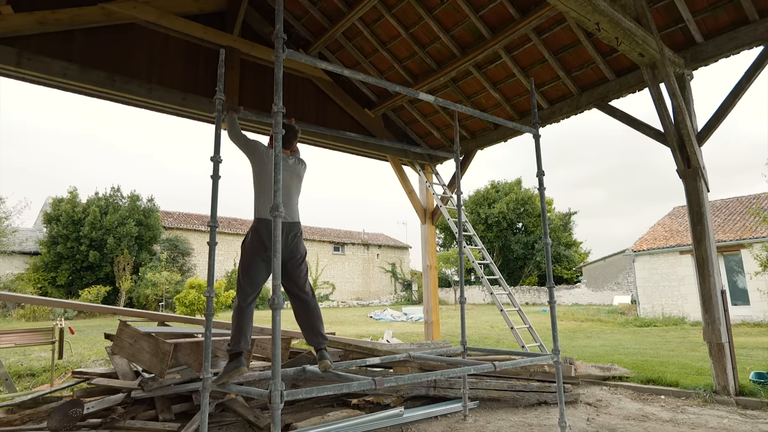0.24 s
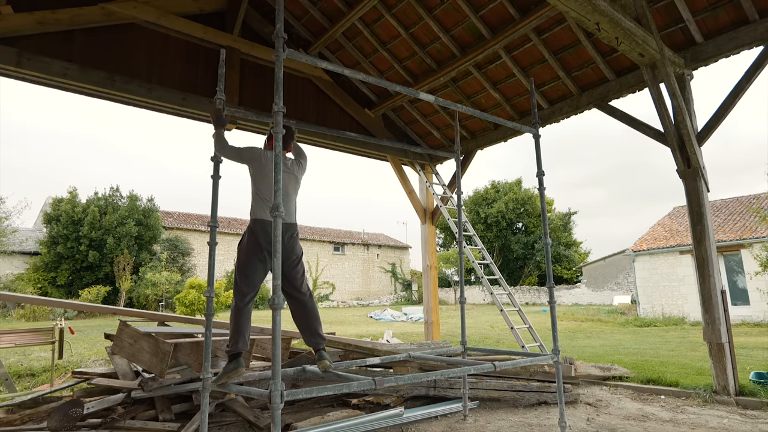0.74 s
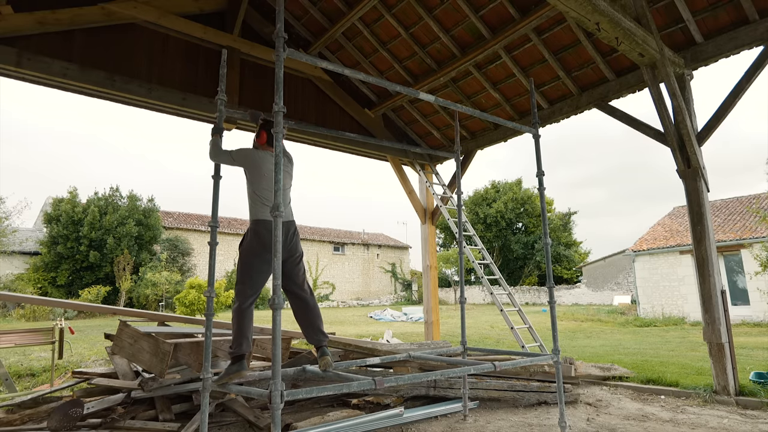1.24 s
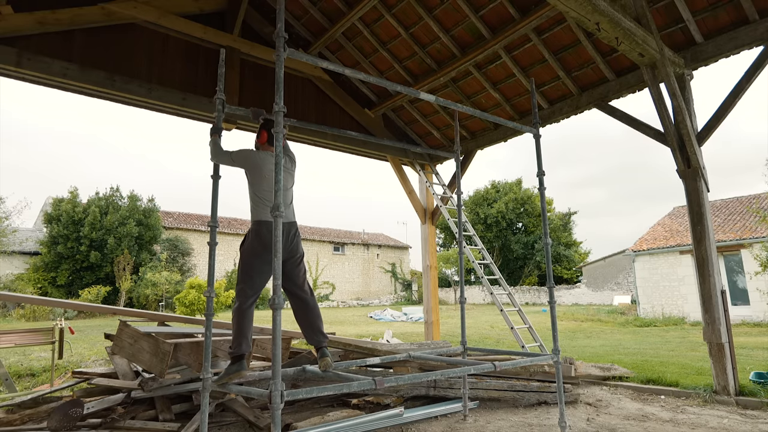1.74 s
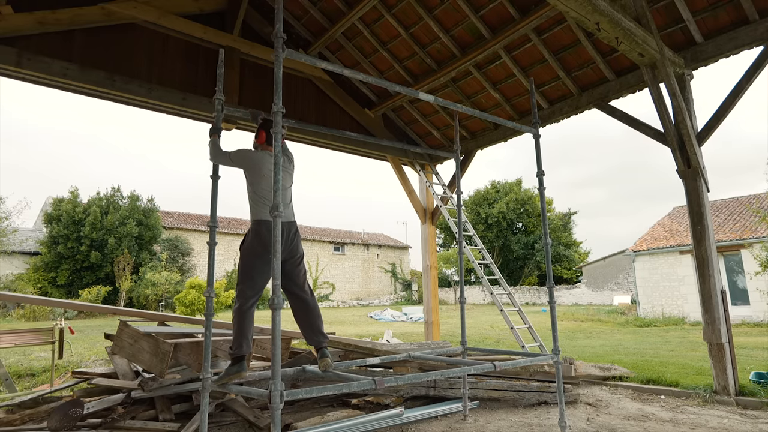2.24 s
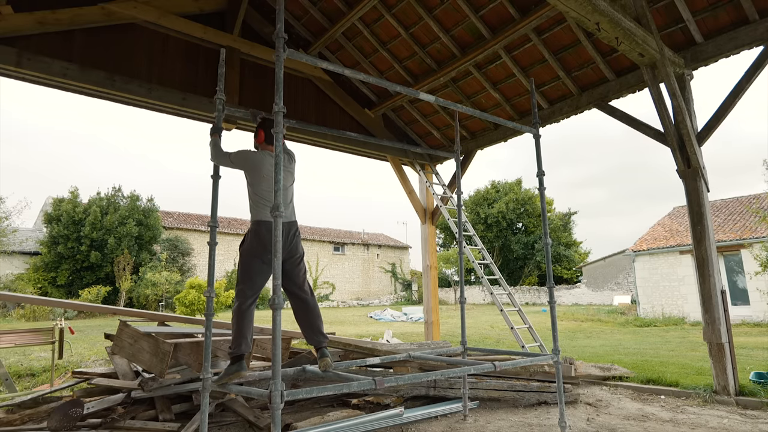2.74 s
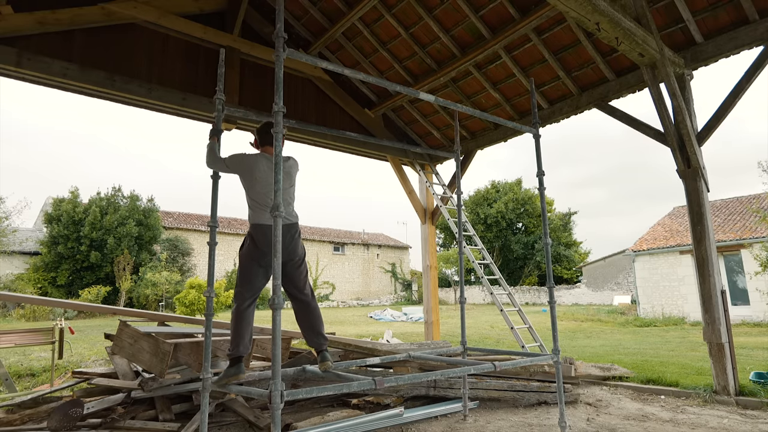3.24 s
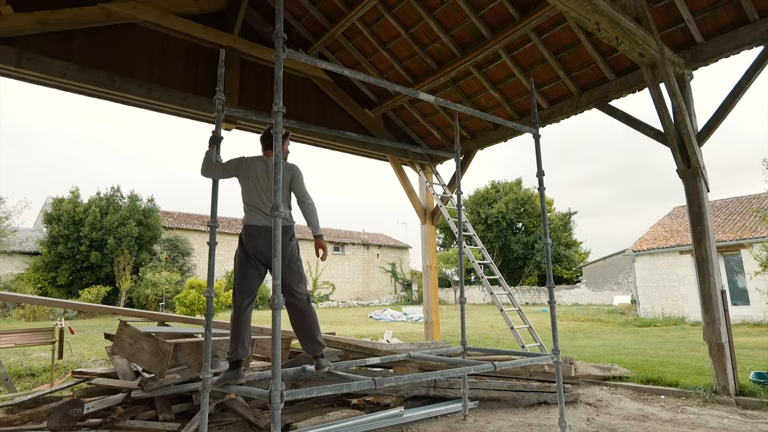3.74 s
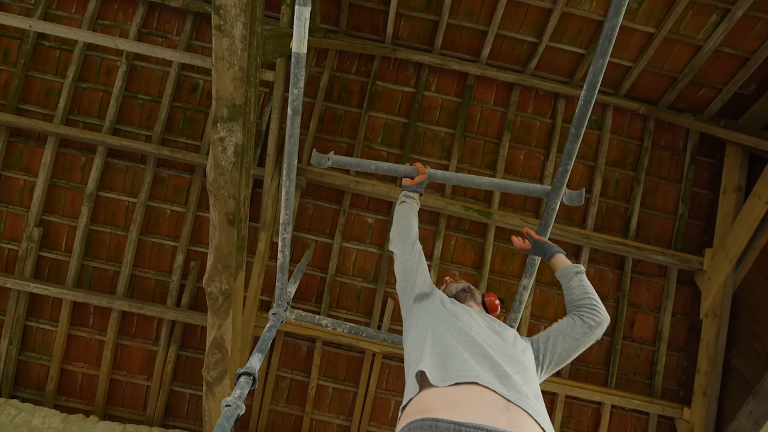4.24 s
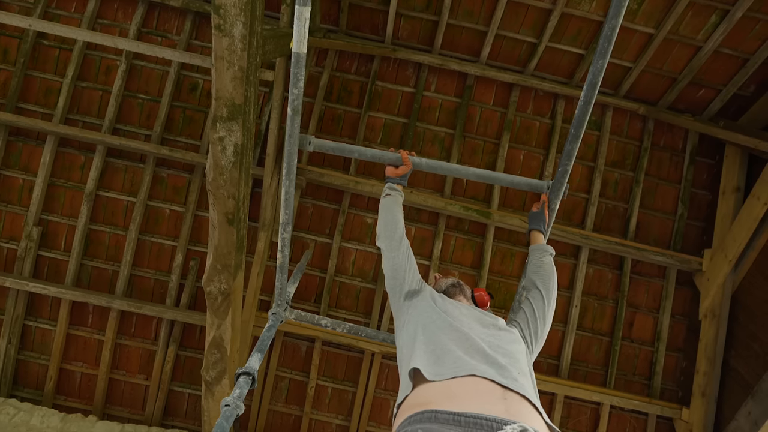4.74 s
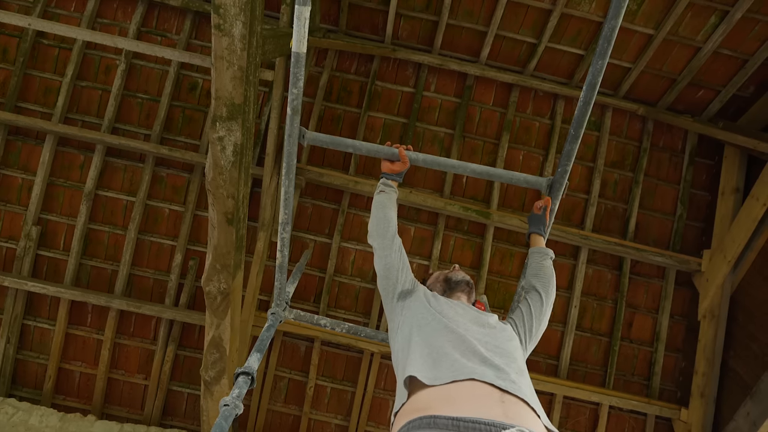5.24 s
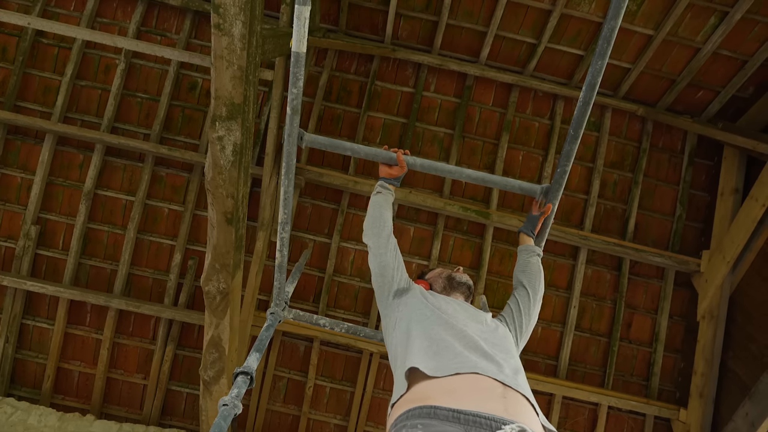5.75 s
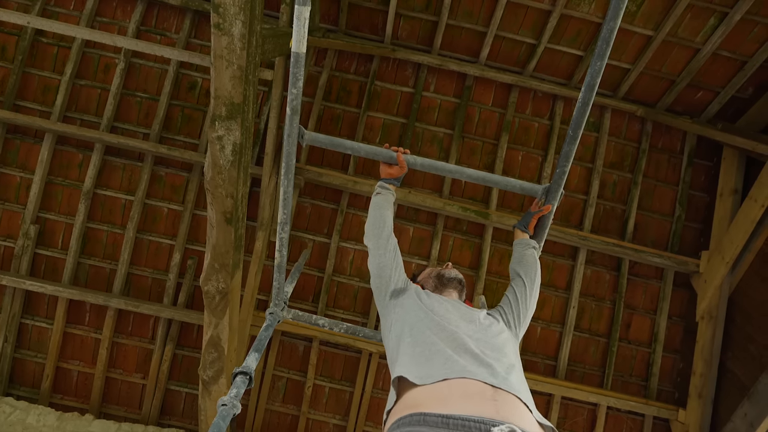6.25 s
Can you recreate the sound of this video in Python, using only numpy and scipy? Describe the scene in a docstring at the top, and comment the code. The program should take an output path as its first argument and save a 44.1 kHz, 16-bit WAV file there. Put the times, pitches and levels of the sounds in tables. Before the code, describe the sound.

Faint grazing of metal and a barely audible distant whine lead into hard, ringing clanks of loose steel tubes, with a short barn reverberation. After them, sleeves swish quietly. The close second part brings a hollow tube clunk and heavy low rumble, light scrapes, a few duller ringing knocks and thin high squeaks. One microphone, quiet outdoor air.

```python
"""Scaffold tubes in an open barn

A worker shakes a standing steel frame under a tiled roof and its joints clank; then, close by, a cross tube
is knocked into its sockets while the swaying tower rumbles. Struck steel is modal: clusters of beating partials
over a crash of filtered, decaying noise. Squeaks and a faint far-off whine are wavering sines; the rumble is
resonant noise; swishing sleeves and quiet country air are coloured noise."""
import sys
import numpy as np
from scipy import signal
from scipy.fft import rfft, irfft
from scipy.io import wavfile
from scipy.ndimage import uniform_filter1d

SR = 44100
rng = np.random.default_rng(int(sys.argv[2]) if len(sys.argv) > 2 else 0)


def unload_audio(sound):
    """Save the sound as a 16-bit wav file, at the path given as the first command line argument."""
    columns = np.transpose(np.atleast_2d(sound))
    # keep every value between -1 and 1, then stretch to whole-number steps
    steps = np.round(np.clip(columns, -1, 1) * 32767)
    wavfile.write(sys.argv[1], SR, steps.astype(np.int16))


N = 287091
TIME = np.arange(N) / SR
RING_TIME = np.arange(SR) / SR  # every blow is computed for one second


def undb(db):
    """Logarithmic level: decibels become an amplitude gain."""
    return 10 ** (np.asarray(db) / 20)


def unit(x):
    """Normalization by the root mean square: the result has rms 1."""
    return x / np.sqrt(np.mean(x ** 2))


def over_pitch(hz, points_hz, values):
    """Logarithmic pitch scale: values are joined by straight lines over log frequency."""
    return np.interp(np.log(np.maximum(hz, 1)), np.log(points_hz), values)


def decay(age_s, t60):
    """Exponential damping: the amplitude loses 60 dB in t60 seconds."""
    return np.exp(-np.log(1000) * age_s / t60)


def envelope(start_s, attack_s, length_s, t60):
    """Attack, hold and release: swell from start_s, hold until length_s has passed, then die away."""
    age = TIME - start_s
    swell = np.sin(np.pi / 2 * np.clip(age / attack_s, 0, 1)) ** 2
    return swell * decay(np.maximum(age - length_s, 0), t60)


def noise(colour):
    """Spectral shaping: white noise is filtered to a curve of (frequency [Hz], level [dB]), at rms 1."""
    gain = undb(over_pitch(np.fft.rfftfreq(N, 1 / SR), *np.transpose(colour)))
    return unit(irfft(rfft(rng.standard_normal(N)) * gain, N))


def walk(rate):
    """Low-frequency modulation: smooth random drift, rate new values a second, spread near 1."""
    step = int(SR / rate)
    held = np.repeat(rng.standard_normal(N // step + 1), step)
    return uniform_filter1d(held, step)[:N]


# Spectrum of the outdoor background: (frequency [Hz], relative level [dB per Hz])
AIR_COLOUR = [(12, -31), (20, -2), (137, 0.5), (207, -7), (478, -8.5), (725, -11.5), (834, -12),
              (2330, -17.5), (2610, -19), (4190, -18), (5850, -27), (14300, -26), (15500, -22)]


def country_air():
    """Broadband ambient noise: a quiet outdoor background whose level drifts slowly."""
    return noise(AIR_COLOUR) * undb(-61.5 + 0.7 * walk(3.8))


# Partials of the far-off whine: (frequency [Hz], mean level [dB])
WHINE_PARTIALS = [(640, -74), (1276, -71.5)]


def whine():
    """Frequency and amplitude modulation: partials waver in pitch together and in level separately."""
    cycles_per_hz = np.cumsum(1 + 0.012 * walk(12)) / SR
    tone = 0
    for hz, db in WHINE_PARTIALS:
        level = undb(db + 3 * walk(5.6)) * np.sqrt(2)  # peak of a sine from its rms
        tone = tone + level * np.sin(2 * np.pi * hz * cycles_per_hz)
    return tone * envelope(0.05, attack_s=0.059, length_s=1.1, t60=0.33)


def contact(hz, bass_db, treble_db, top_db):
    """Contact spectrum: the middle stays level while bass, treble and top are raised or lowered."""
    return over_pitch(hz, [400, 1000, 2200, 4500, 9500], [bass_db, 0, 0, treble_db, top_db])


# Decay of a blow in each band, before the stretch that each blow applies to the steel:
# (band centre [Hz], t60 of the steel [s], t60 of the barn [s], share of the barn [dB])
BAND_DECAY = [(150, 0.22, .9, -5), (450, 0.37, 0.64, -16.5), (1110, 0.23, 0.47, -13.5),
              (2570, .22, 0.18, -21.5), (4350, 0.28, 0.18, -18), (6700, 0.28, 0.21, -17.5),
              (13000, 0.14, .42, -14.5)]


def crash(gain, hz, stretch, rattle_db):
    """High modal density: countless short modes act as noise; the joint chatters, the barn reverberates."""
    spectrum = rfft(rng.standard_normal(len(RING_TIME))) * gain
    centres = [row[0] for row in BAND_DECAY]
    chatter = undb(rattle_db * walk(300)[:len(RING_TIME)])
    out = 0
    for share, (_, steel_s, barn_s, barn_db) in zip(np.eye(len(BAND_DECAY)), BAND_DECAY):
        band = irfft(spectrum * over_pitch(hz, centres, share), len(RING_TIME))
        steel_part = chatter * decay(RING_TIME, steel_s * stretch)
        barn_part = undb(barn_db) * decay(RING_TIME, barn_s)
        out = out + band * np.hypot(steel_part, barn_part)
    return out


def partials(modes, count=7):
    """Beating: alike tubes split each mode into close partials (cosine and sine, modes, count, time)."""
    hz, _, t60, width = np.transpose(modes)
    place = np.linspace(-1, 1, count)
    scatter = rng.uniform(-2, 2.2, (len(hz), count)) / count
    split_hz = hz[:, None] + width[:, None] * (place + scatter)
    angle = np.float32(2 * np.pi * split_hz[:, :, None]) * np.float32(RING_TIME)
    weight = np.float32(unit(1 - np.abs(place) / 2) / np.sqrt(count))
    damping = np.float32(decay(RING_TIME, t60[:, None, None]))
    return np.array([np.cos(angle), np.sin(angle)]) * (weight[:, None] * damping)


def steel(blows, modes, body, body_db, ring_db, ripple_db, rattle_db, scrape_db):
    """Modal superposition: each blow excites a crash and the ringing modes in its own mix."""
    hz = np.fft.rfftfreq(len(RING_TIME), 1 / SR)
    mode_hz, mode_db = np.transpose(modes)[:2]
    rings = partials(modes)
    # weak resonances, the same for every blow, ripple the spectrum of the crash
    ripple_hz = np.arange(0, SR / 2, 24)
    ripple = np.interp(hz, ripple_hz, rng.standard_normal(len(ripple_hz))) * np.minimum(hz / 700, 1)
    colour = undb(over_pitch(hz, *np.transpose(body)) + ripple_db * ripple)
    middle = (hz > 800) & (hz < 2500)
    colour /= np.sqrt(np.mean(colour ** 2 * middle))
    out = np.zeros(N + len(RING_TIME))
    for s, db, bass_db, treble_db, top_db, own_ring_db, rise_s, stretch in blows:
        tilt = bass_db, treble_db, top_db
        spread_db = 1.5 * rng.standard_normal(len(modes))
        sizes = undb(mode_db + own_ring_db + contact(mode_hz, *tilt) + spread_db)
        # the partials of one mode start roughly in step
        phase = 2 * np.pi * rng.random((len(modes), 1)) + 1.2 * rng.standard_normal(rings.shape[1:3])
        weights = np.float32(sizes[:, None] * [np.cos(phase), np.sin(phase)])
        ring = np.tensordot(weights, rings, axes=3)
        # slow contacts chatter by a different amount from sharp knocks
        grain_db = rattle_db + scrape_db * np.tanh(rise_s / 0.0074)
        body_sound = crash(colour * undb(contact(hz, *tilt)), hz, stretch, grain_db)
        hit = undb(body_db) * body_sound + undb(ring_db) * ring
        rise = 1 - np.exp(-RING_TIME / max(rise_s, 1 / SR))
        start = max(int(s * SR), 0)
        out[start:start + len(hit)] += undb(db) * hit * rise
    return out[:N]


def clanks(rows, tone, tilt, rise_s):
    """Impulsive excitation: sharp knocks share one rise time constant, and hardness tilts their colour."""
    return [(s, db, *np.add(tone, hardness * np.array(tilt)), ring_db, rise_s, stretch)
            for s, db, hardness, ring_db, stretch in rows]


# Effect of hardness on a scrape: (bass, treble, top) [dB per dB of hardness]
SCRAPE_HARDNESS_TILT = (-0.22, 0.98, 0.83)


def scrapes(rows, tone, ring_db, stretch):
    """Frictional excitation: grazing contacts have their own rise times, weak ring and longer crash."""
    return [(s, db, *np.add(tone, hardness * np.array(SCRAPE_HARDNESS_TILT)), ring_db, rise_s, stretch)
            for s, db, hardness, rise_s in rows]


# Ringing modes of the frame, each a cluster of close partials:
# (frequency [Hz], relative level [dB], t60 [s], nominal half-width of the cluster [Hz])
FRAME_RINGING_MODES = [(201, -20, 0.46, 20), (330.2, -17.5, 0.24, 12), (583, -15, .42, 25),
                       (823, -8, 0.52, 30), (1076, -6, 0.54, 14), (1111, -15.5, .45, 8.6),
                       (1230, -11, 0.27, 37), (1358, -6, .42, 14), (1388, -7.5, 0.48, 15),
                       (1686, 2, 0.35, 14), (1995, 0, 0.33, 32), (2380, -0.5, .42, 12),
                       (2754, -16, 0.62, 17), (3100, -12.5, .44, 20), (3540, -17, .36, 15),
                       (3709, -28, 0.92, 0.33), (4200, -32, 1.0, .5), (4170, -13, 0.63, 140),
                       (4610, -15.5, .44, 70), (5330, -28.5, 0.2, 12), (5700, -26.5, 0.23, 23)]
# Crowd of short-lived modes under the ring: (frequency [Hz], relative level [dB per Hz])
FRAME_CRASH_COLOUR = [(25, -19), (60, -20.5), (125, -21), (200, -18), (400, -10.5), (620, -2.5),
                      (1100, 4.5), (1450, 2.5), (2200, -3.5), (3600, -7.5), (4500, -4), (6300, -18.5),
                      (10000, -26), (15500, -38)]
# Clanks in the frame's joints:
# (time [s], relative level [dB], hardness [dB], relative ring level [dB], stretch of the crash decay [factor])
FRAME_KNOCKS = [(1.159, -25.5, -7.5, -2.5, 1.54), (1.214, -19.5, 2.5, 4.5, 1.65), (1.34, -3, 6, -7, .8),
                (1.356, -10, -1, -4, 0.75), (1.484, -21, -10, -10.5, 0.94), (1.593, -33.5, 10, -7, 2.6),
                (1.654, -21, -11.5, -4.5, 1), (1.849, -16, -5, -8, 0.88), (2.043, -5.5, 1, -3, 0.8),
                (2.092, -13.5, -1.5, -18.5, 1.3), (2.267, -13.5, -1.5, -5.5, 1.07)]
# Scrapes as the load shifts: (time [s], relative level [dB], hardness [dB], rise time constant [s])
FRAME_GRAZES = [(0.089, -61.5, -0.5, 0.0079), (0.22, -55.5, -3.5, 0.0008), (0.288, -47, 2.5, 0.0063),
                (0.319, -59, 5, 0.0026), (0.362, -52.5, 4.5, 0.0027), (0.564, -45.5, 4.5, 0.0038),
                (0.672, -49, -5, 0.0045), (0.848, -51, -0.5, 0.023), (0.925, -53.5, -2, .025),
                (1.047, -55.5, -3.5, 0.015), (1.135, -48, 2.5, 0.019), (2.825, -60, -8, 0.011)]
# Colour of each kind of contact at hardness 0: (bass [dB], treble [dB], top [dB])
FRAME_KNOCK_TONE = (0.4, -1.1, -1.1)
FRAME_GRAZE_TONE = (6, 11, 22.1)
# A harder knock loses bass and gains treble: (bass, treble, top) [dB per dB of hardness]
FRAME_HARDNESS_TILT = (-.85, .25, 1)


def standing_frame():
    """Shared modes: many alike tubes clank and scrape in loose joints and excite one set of resonances."""
    blows = (clanks(FRAME_KNOCKS, FRAME_KNOCK_TONE, FRAME_HARDNESS_TILT, rise_s=0.0034)
             + scrapes(FRAME_GRAZES, FRAME_GRAZE_TONE, ring_db=-6, stretch=1.3))
    return steel(blows, FRAME_RINGING_MODES, FRAME_CRASH_COLOUR,
                 body_db=-2.0, ring_db=-3.5, ripple_db=4.0, rattle_db=0.9, scrape_db=1.5)


# Spectrum of rubbing cloth before the tilt: (frequency [Hz], relative level [dB per Hz])
CLOTH_COLOUR = [(500, -8.5), (1000, -0.5), (1800, 1), (3800, 3), (6000, -4.5), (10000, -8.5),
                (15000, -16.5)]
# A sleeve rubs as the arm lets go, drops and lifts:
# (time [s], time until release [s], level [dB], tilt [dB per octave])
SLEEVE_RUBS = [(3.088, 0.053, -60, 7), (3.165, 0.56, -60.5, 0.1), (3.859, 0.35, -53.5, -.2)]


def sleeves():
    """Friction noise: cloth slides over cloth with an uneven grain, once for each move of the arm."""
    attack_s, t60_s = 0.19, 0.41
    hz, colour_db = np.transpose(CLOTH_COLOUR)
    out = 0
    for s, length_s, db, tilt in SLEEVE_RUBS:
        cloth = noise(np.c_[hz, colour_db + tilt * np.log2(hz)])
        out = out + undb(db) * cloth * envelope(s, min(attack_s, length_s), length_s, t60_s)
    return out * undb(2.1 * walk(35))


def wobble(modes):
    """Random excitation of resonance: low modes filter noise, which is then held at an even level."""
    hz = np.fft.rfftfreq(N, 1 / SR)
    gain = sum(undb(db) / (1 + (2 * (hz - centre) / width) ** 2) for centre, width, db in modes)
    x = irfft(rfft(rng.standard_normal(N)) * gain, N)
    return x / np.sqrt(uniform_filter1d(x ** 2, SR // 8))


# Low resonances of the tower: (frequency [Hz], width [Hz], relative level [dB])
TOWER_SWAY_MODES = [(28.3, 3.4, 0), (35, 4.8, -12), (46.7, 5.7, -6)]
TOWER_SHUDDER_MODES = [(54.7, 13, -5.5), (67.6, 5.3, 12), (88.5, 12, -17), (114, 45, -12.5)]
# Blows of the cross tube jolt the tower: (time [s], slow sway level [dB], shudder level [dB])
TOWER_JOLTS = [(4.261, -36, -36.5), (4.53, -60, -43.5), (4.66, -52, -44.5), (4.89, -55, -47),
               (5.06, -47, -37), (5.721, -43, -37.5), (5.93, -43.5, -46.5), (6.18, -58.5, -47.5)]


def tower():
    """Energy summation: jolts make the tower sway and shudder, over motion that slowly settles."""
    attack_s, hold_s, jolt_t60_s, settle_t60_s = 0.048, 0.038, 0.4, 12.3
    settle_sway_db, settle_shudder_db = -45.5, -52.5
    times, sway_db, shudder_db = np.transpose(TOWER_JOLTS)
    jolts = np.array([envelope(s, attack_s, attack_s + hold_s, jolt_t60_s) for s in times])
    settling = envelope(times[0], attack_s, attack_s, settle_t60_s)  # begins with the first jolt
    sway = np.sqrt(undb(sway_db) ** 2 @ jolts ** 2 + (undb(settle_sway_db) * settling) ** 2)
    shudder = np.sqrt(undb(shudder_db) ** 2 @ jolts ** 2 + (undb(settle_shudder_db) * settling) ** 2)
    return wobble(TOWER_SWAY_MODES) * sway + wobble(TOWER_SHUDDER_MODES) * shudder


# Ringing modes of the cross tube: (frequency [Hz], relative level while loose [dB],
# relative level once seated [dB], t60 [s], nominal half-width of the cluster [Hz])
TUBE_RINGING_MODES = [(218.5, -29, -24, 0.84, 10), (370, -8, -17.5, 0.42, 6), (564, -5, -13, 0.45, 9.6),
                      (807, -6, -13, 0.2, 20), (859, -12.5, -21, 0.72, 1.2), (1025, -4, -16, 0.65, 8),
                      (1080, -10, -10, 0.47, 8.1), (1310, -4.5, -7.5, 0.57, 28),
                      (1322, -0.5, -1.5, 0.25, 15), (1500, -16.5, -18, 0.75, 4.2),
                      (1656, -30.5, -16.5, 0.81, 2.4), (1960, -4.5, -1, 0.24, 9.4),
                      (2094, -16.5, -20, 1.42, 1.06), (2340, -15, -10, 0.46, 13),
                      (2740, -12.5, -11, .62, 11), (3104, -24, -8, 0.38, 11), (3310, -36, -16, 0.44, 8.7),
                      (3840, -32, -13, 0.62, 26), (4160, -10.5, -12.5, 0.61, 0.67),
                      (4190, -12, -13, 0.87, 130), (5010, -32, -19, 0.22, 27), (5590, -16, -4, 0.11, 7.9),
                      (6430, -26, -7.5, 0.16, 5.7), (11800, -36, -27, .5, 31),
                      (11550, -25, -23.5, 0.59, 270)]
# Crowd of short-lived modes, loose and seated: (frequency [Hz], relative level [dB per Hz])
LOOSE_CRASH_COLOUR = [(90, -14), (150, -22.5), (220, -5.5), (290, -14.5), (380, -8), (650, -0.5),
                      (1300, 0.5), (1750, -8), (2400, -11.5), (3500, -20), (4300, -7.5), (6300, -21),
                      (9500, -34.5), (15500, -50)]
SEATED_CRASH_COLOUR = [(90, -15), (150, -18.5), (220, -3.5), (290, -12.5), (570, -6.5), (900, -6),
                       (1350, 0.5), (2000, -1.5), (2800, -6.5), (3500, -11.5), (4400, -3.5), (6300, -14),
                       (9500, -20.5), (15500, -33)]
# Clanks of the cross tube:
# (time [s], relative level [dB], hardness [dB], relative ring level [dB], stretch of the crash decay [factor])
TUBE_KNOCKS = [(4.279, -28.5, -2, -1.5, 2.2), (4.315, -16.5, 2.5, -2.5, 0.62), (4.358, -20, -11, -4, 1.4),
               (4.495, -34.5, -39, -4.5, 1.7), (4.895, -14.5, 2.5, -1.5, 1.05),
               (5.057, -20, -11.5, 4, 1.25), (5.098, -23, -16.5, -0.5, 1.98), (5.2, -27.5, -20, -4, 0.72),
               (5.715, -21.5, -16, -16, 1.1)]
# Scrapes against the sockets: (time [s], relative level [dB], hardness [dB], rise time constant [s])
TUBE_GRAZES = [(4.638, -39, -0.5, 0.0077), (4.705, -40.5, 4, 0.0075), (5.342, -47, -18, .004),
               (5.536, -50.5, 3.5, 0.016), (5.884, -48, -8, 0.0075), (6.008, -46.5, -5, .012),
               (6.144, -50.5, -4.5, 0.013), (6.35, -63, 5, .008)]
# Colour of each kind of contact at hardness 0: (bass [dB], treble [dB], top [dB])
TUBE_KNOCK_TONE = (0.27, 1.1, -.6)
TUBE_GRAZE_TONE = (8.5, 2.2, 0.83)
# A harder knock loses bass and gains treble: (bass, treble, top) [dB per dB of hardness]
TUBE_HARDNESS_TILT = (-0.29, 0.29, 1.3)


def cross_tube():
    """Boundary conditions: loose in the hand it rings low and hollow; seated, it drives the uprights brighter."""
    seated_from_s = 4.85
    blows = np.array(clanks(TUBE_KNOCKS, TUBE_KNOCK_TONE, TUBE_HARDNESS_TILT, rise_s=0.00065)
                     + scrapes(TUBE_GRAZES, TUBE_GRAZE_TONE, ring_db=-5, stretch=1.68))
    hz, loose_db, seated_db, t60, width = np.transpose(TUBE_RINGING_MODES)
    is_loose = blows[:, 0] < seated_from_s
    loose = steel(blows[is_loose], np.c_[hz, loose_db, t60, width], LOOSE_CRASH_COLOUR,
                  body_db=-3, ring_db=-3, ripple_db=6.5, rattle_db=-0.5, scrape_db=2.3)
    seated = steel(blows[~is_loose], np.c_[hz, seated_db, t60, width], SEATED_CRASH_COLOUR,
                   body_db=-3.0, ring_db=-2.5, ripple_db=5.5, rattle_db=2.0, scrape_db=-2.5)
    return loose + seated


# Joints squeak as they twist: (time [s], length [s], mean pitch [Hz], mean peak level [dB])
JOINT_SQUEAKS = [(5.525, 0.12, 4350, -56), (5.72, 0.3, 4140, -51.5), (5.872, 0.085, 3630, -59)]


def squeaks():
    """Stick-slip tone: steel twisting on steel sings briefly on one note of unsteady pitch and level."""
    out = np.zeros(N)
    for s, length_s, hz, db in JOINT_SQUEAKS:
        swell = np.sin(np.pi * np.clip((TIME - s) / length_s, 0, 1)) ** 2
        level = undb(db + 1.9 * walk(90))
        cycles = np.cumsum(hz * (1 + 0.0065 * walk(250))) / SR
        out += level * swell * np.sin(2 * np.pi * cycles)
    return out


def scene():
    """Linear superposition: all sources add at one microphone."""
    background = country_air() + whine()
    steelwork = standing_frame() + tower() + cross_tube() + squeaks()
    return (background + steelwork + sleeves())[None]


def record(dry):
    """Saturation and band limiting: the hardest clanks overload the recorder softly; the top is cut."""
    ceiling, top_hz = 1.05, 15900
    squashed = dry / (1 + (dry / ceiling) ** 4) ** (1 / 4)
    low_pass = signal.ellip(10, 0.2, 70, top_hz, fs=SR, output="sos")  # ripple and stopband in dB
    return signal.sosfilt(low_pass, squashed)


dry = scene()
out = record(dry)
unload_audio(out)
```